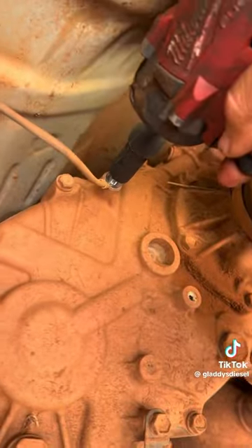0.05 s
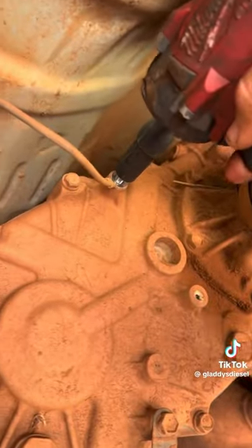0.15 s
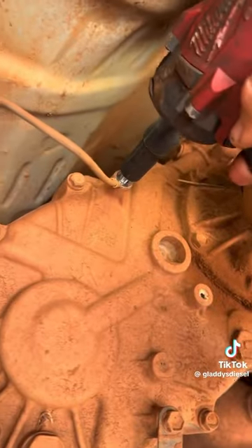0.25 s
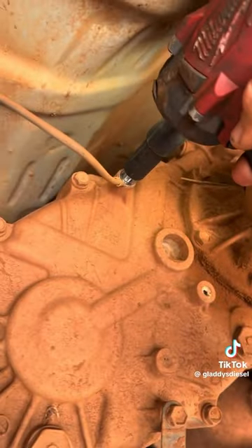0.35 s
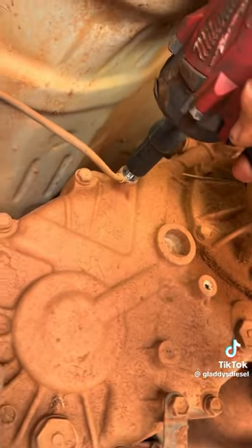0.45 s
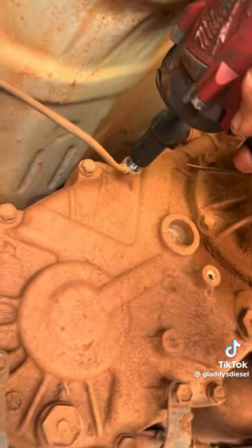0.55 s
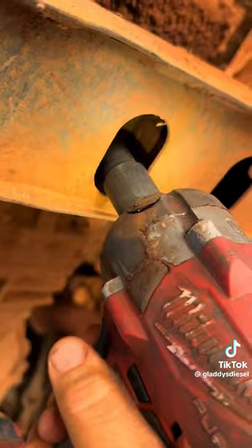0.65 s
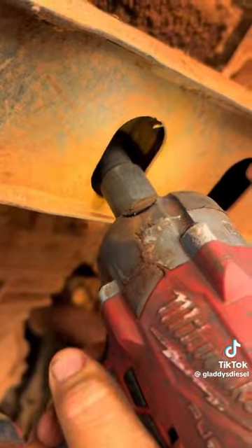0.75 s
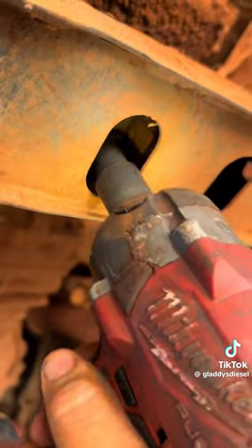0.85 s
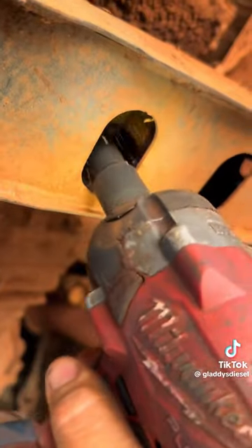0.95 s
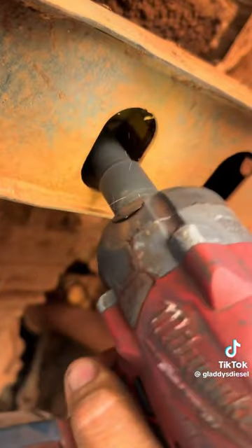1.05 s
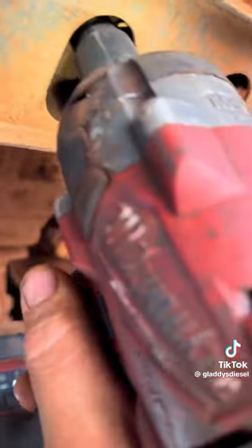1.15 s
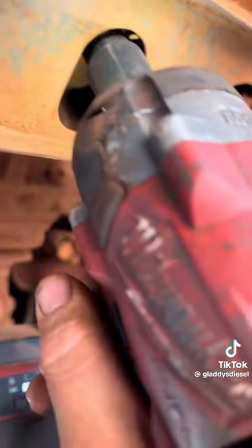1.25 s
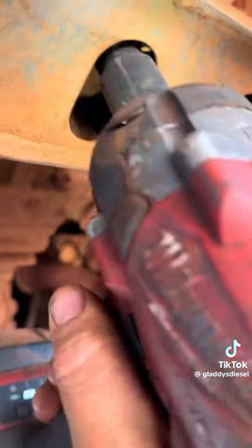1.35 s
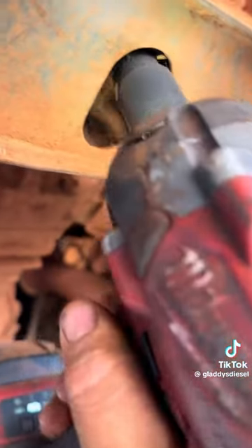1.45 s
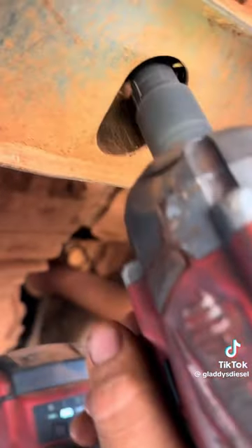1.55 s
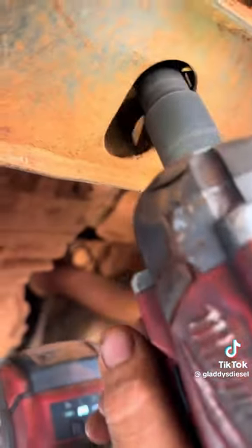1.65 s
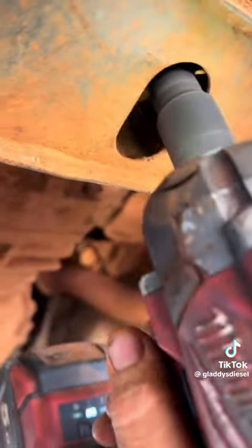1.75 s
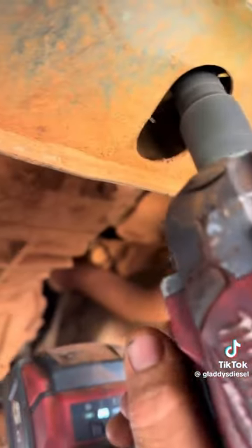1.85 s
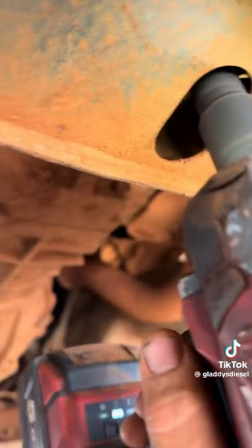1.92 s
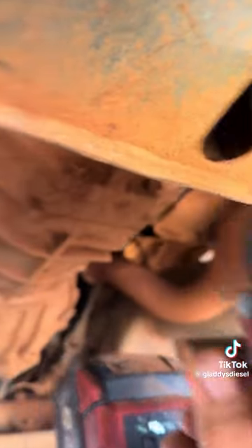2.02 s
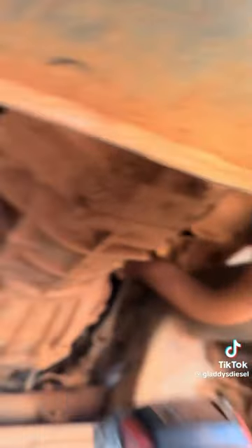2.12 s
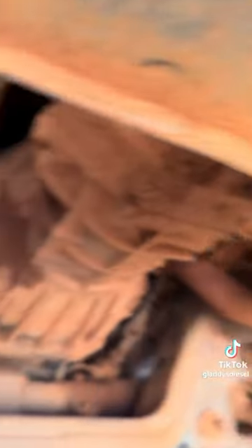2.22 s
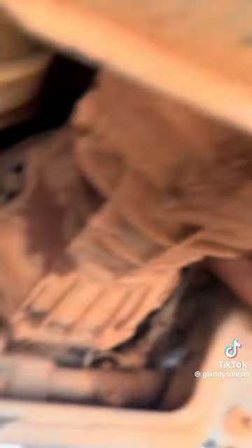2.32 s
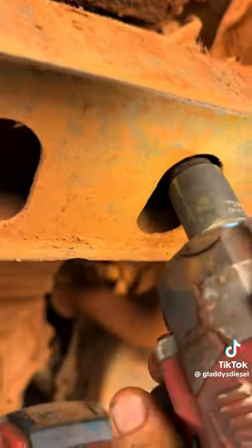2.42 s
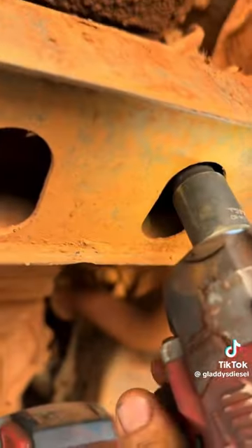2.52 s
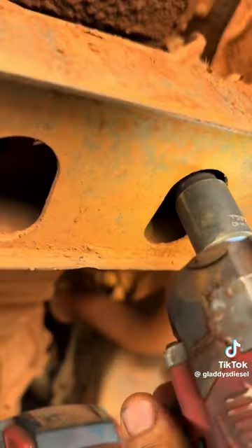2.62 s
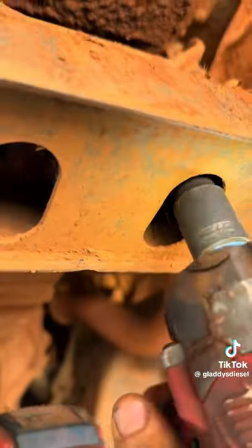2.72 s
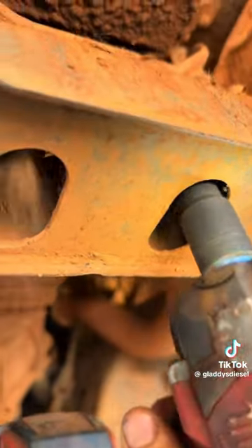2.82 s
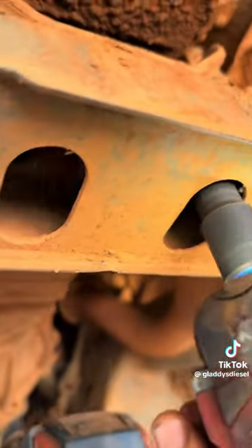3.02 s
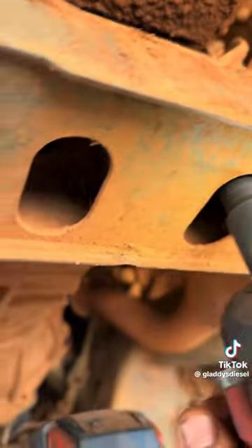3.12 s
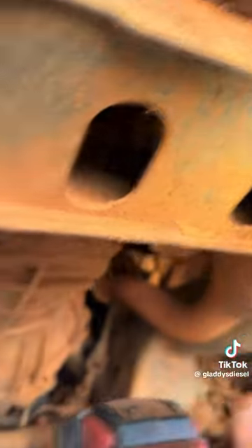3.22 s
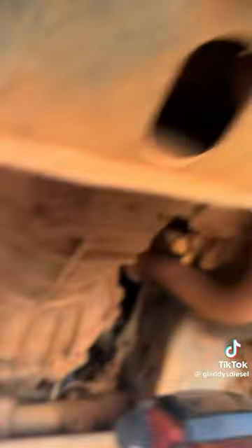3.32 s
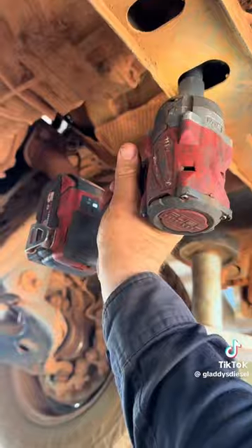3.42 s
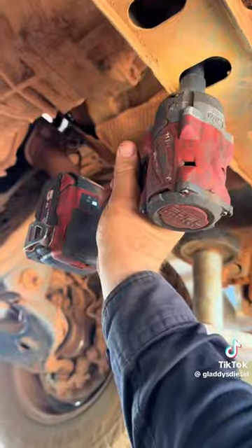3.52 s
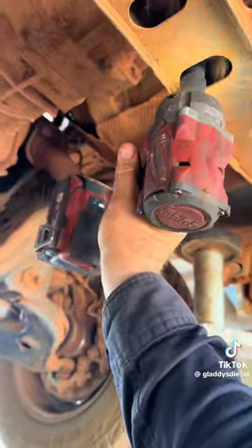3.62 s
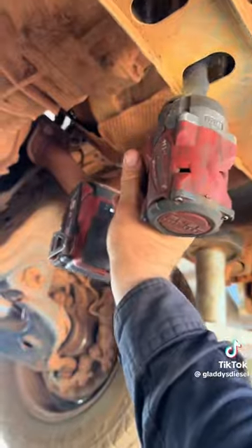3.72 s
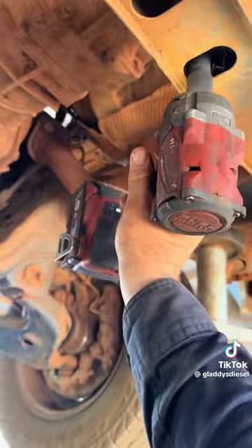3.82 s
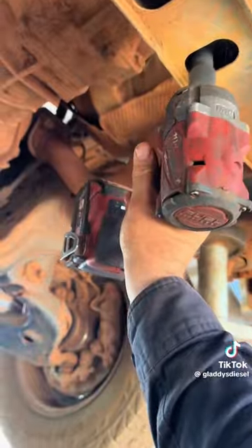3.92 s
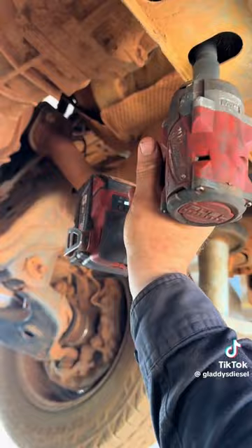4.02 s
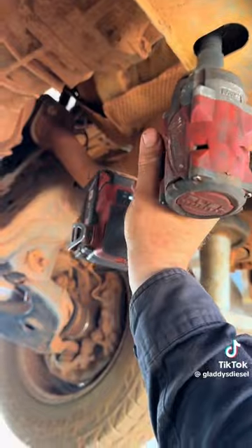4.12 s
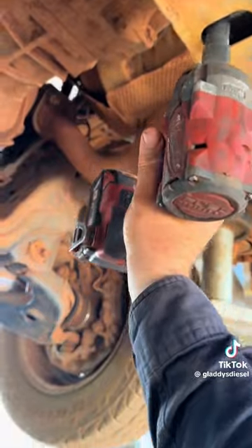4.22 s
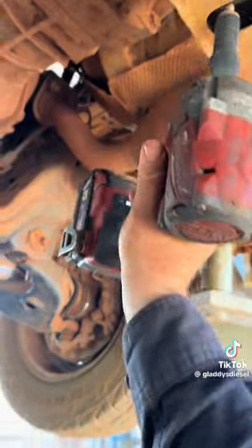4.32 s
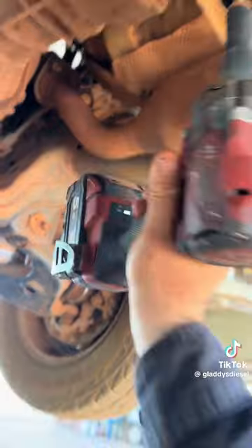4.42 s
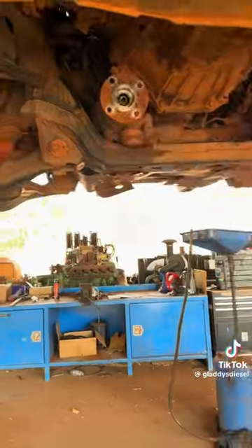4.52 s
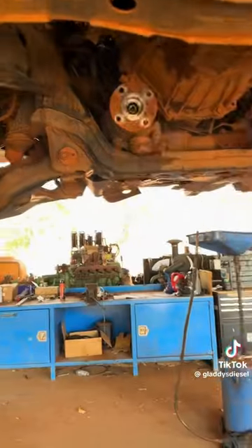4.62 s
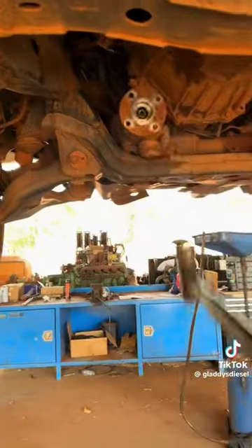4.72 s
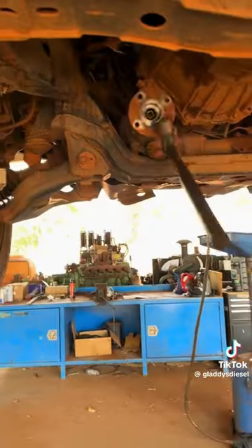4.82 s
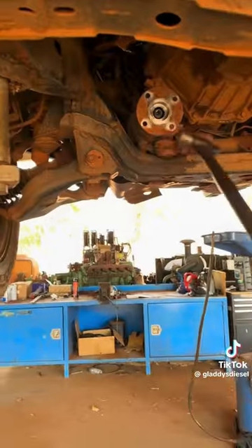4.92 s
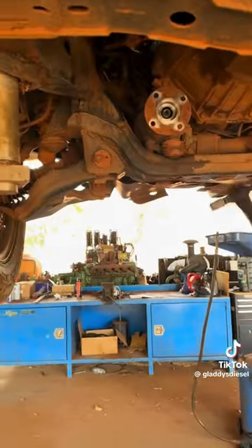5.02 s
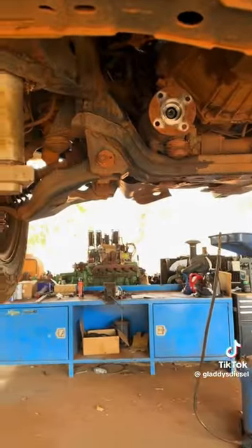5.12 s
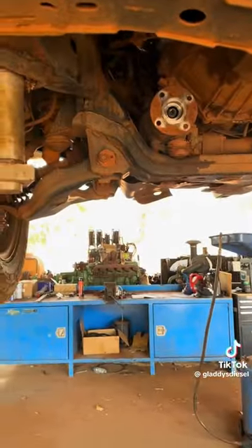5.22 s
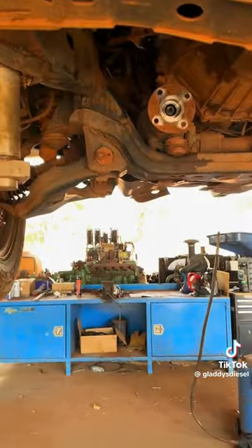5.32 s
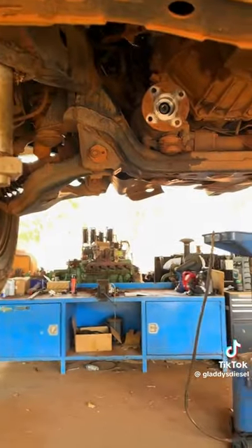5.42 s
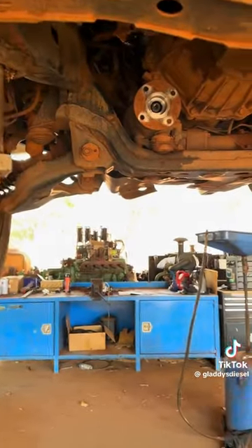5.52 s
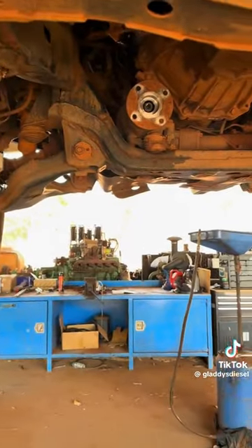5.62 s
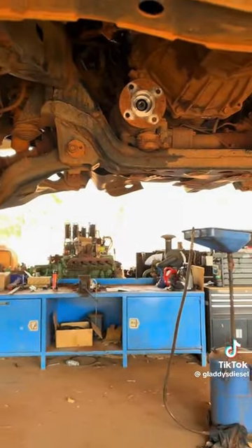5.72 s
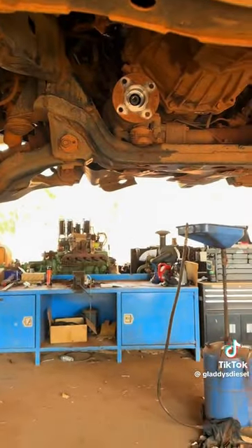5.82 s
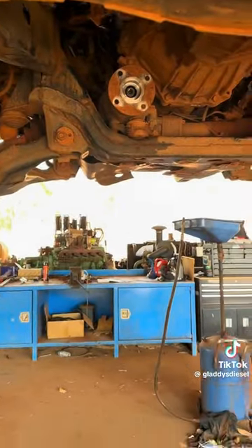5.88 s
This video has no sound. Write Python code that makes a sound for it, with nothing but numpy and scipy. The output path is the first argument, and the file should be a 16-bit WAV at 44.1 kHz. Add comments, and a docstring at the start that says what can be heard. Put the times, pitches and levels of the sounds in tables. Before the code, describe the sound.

Low workshop rumble and faint hiss, then a loose socket ticks and a battery impact wrench fires four times, close and fairly dry: brief harsh hammering, then smooth motor whine slowing down. The first burst stops abruptly; the last sounds slightly wider and more distant. Then a hard steel clank with a low panel boom, and a part clattering onto the floor with long bright reverberation.

```python
"""Workshop rumble and hiss, a low bump of the hands and a socket's tick open the scene.
A cordless impact wrench then undoes four bolts under a vehicle: the starting motor squeals and grinds,
the hammer strikes a few blows (noise bursts), and the freed bolt spins with a gear whine (sines at motor orders).
Then steel clanks against the underbody, which booms (resonant noise), and a steel part drops and bounces on
the floor of the hall (noise bursts and decaying modes)."""
import sys
import numpy as np
from scipy import signal
from scipy.fft import rfft, irfft
from scipy.io import wavfile
from scipy.ndimage import uniform_filter1d

SR = 44100
rng = np.random.default_rng(int(sys.argv[2]) if len(sys.argv) > 2 else 0)


def persist_wave(psi):
    """Save psi, clipped to +-1, as 16-bit WAV."""
    counts = np.round(np.clip(psi, -1, 1) * 32767).astype(np.int16)
    wavfile.write(sys.argv[1], SR, np.atleast_2d(counts).T)


N = 262395
TIME = np.arange(N) / SR
FREQS = np.fft.rfftfreq(N, 1 / SR)

# hammering, one row a bolt: trigger_s, hammer_start_s, hammer_end_s, rattle_db, squeal_db, grind_db,
#   rail_knock_db (relative to a blow)
BOLTS = [(0.621, 0.665, 0.78, -21, -30, -17, -15), (1.181, 1.223, 1.345, -20.5, -37.5, -20, -13),
         (2.467, 2.522, 2.62, -20, -48, -27.5, -15.5), (3.329, 3.375, 3.52, -23, -46, -22, -8.5)]
# free spinning, one row a bolt: free_s, full_speed_s, eased_s, silent_s, whirr_db, order_8_db,
#   order_13_loaded_db, order_13_full_speed_db, housing_drone_db, frame_drone_db
SPINS = [(.765, 0.979, 1.08, 1.087, -30.5, -29, -48.5, -34, -39.5, -55),
         (1.35, 1.545, 1.83, 1.94, -32, -29.5, -34, -49, -42.5, -58),
         (2.619, 2.8, 3.028, 3.155, -31.5, -29, -34, -32, -42, -53),
         (3.49, 3.651, 3.909, 4.035, -29, -28.5, -33, -29.5, -32.5, -42.5)]
# steel clanking on the underbody: start_s, level_db, crack_t60_s, ring_db
CLANKS = [(4.7445, -9.5, 0.016, -28), (4.759, -25, 0.093, -56)]
# spectrum of air hiss and of the scraping socket: frequency_hz, level_db
HISS_SPECTRUM = [(100, 6), (900, -6.5), (1800, -7), (2400, -5.5), (3000, -5.5), (3500, -6), (4300, -7.5),
                 (7000, -6.5), (9500, -8), (12000, -33.5), (16000, -26)]
# brief drop-outs of the level: start_s, end_s
DROPOUTS = [(2.358, 2.384), (3.272, 3.295)]
# motor speed in turns per second: dragging the bolt, clear of the thread, flat out, trigger eased
DRAG_HZ, CLEAR_HZ, TOP_HZ, EASED_HZ = 335.6, 376.6, 381.6, 341.6
EASE_S = .062  # the speed takes this long to sag once the trigger is eased


def amp(db):
    """Level: decibels to an amplitude ratio."""
    return 10 ** (np.asarray(db) / 20)


def unit(x):
    """Normalization: scales a signal to rms 1."""
    return x / np.sqrt(np.mean(x ** 2) + 1e-20)


def read(points, hz):
    """Interpolation: reads a spectrum table on a log-frequency axis."""
    f, value = np.transpose(points)
    return np.interp(np.log(hz + 1), np.log(f + 1), value)


def level(s, db):
    """Envelope: a gain linear in decibels between points, fading out just beyond them."""
    return amp(np.interp(TIME, np.r_[s[0] - .015, s, s[-1] + .015], np.r_[-140, db, -140]))


def gate(start, end, fade_s=.015):
    """Envelope: 1 from start to end, fading linearly just beyond them."""
    return np.interp(TIME, [start - fade_s, start, end, end + fade_s], [0, 1, 1, 0])


def add(mix, s, sound):
    """Superposition: mixes a sound in at time s."""
    part = mix[..., round(s * SR):][..., :sound.shape[-1]]
    part += sound[..., :part.shape[-1]]


def white():
    """Broadband noise: two uncorrelated signals of flat spectrum."""
    return rng.standard_normal((2, N))


def wander(rate_hz):
    """Random modulation: a smoothly varying signal of rms 1."""
    knots = np.arange(0, N / SR + 1, 1 / rate_hz)
    return unit(np.interp(TIME, knots, rng.standard_normal(len(knots))))


def tone(turns):
    """Simple harmonic motion: a sine pair in quadrature, one for each path to the ports."""
    return np.array([np.cos(2 * np.pi * turns), np.sin(2 * np.pi * turns)])


def crack(t, t60):
    """Exponential decay: a dying burst of steel-on-steel chatter."""
    return rng.standard_normal((2, len(t))) * amp(-60 * t / t60)


def colour(x, points, ripple_db=0, size=4096):
    """Minimum-phase filtering at unit energy; ripple stands for the many close modes of a metal body."""
    hz = abs(np.fft.fftfreq(size, 1 / SR))
    ripple = unit(uniform_filter1d(rng.standard_normal(size), size=9))
    mirrored = ripple[np.rint(hz * size / SR).astype(int)]
    log_gain = np.log(amp(read(points, hz) + ripple_db * mirrored))
    # the Hilbert transform of the log gain gives the phase of a causal filter
    taps = np.fft.ifft(np.exp(np.conj(signal.hilbert(log_gain)))).real[:size // 2]
    return signal.oaconvolve(x, taps[None] / np.linalg.norm(taps), axes=1)[:, :N]


def resonant(x, modes):
    """Resonance: drives steep peaks (frequency_hz, width_hz, level_db) and scales the result to rms 1."""
    gain = sum(amp(db) / (1 + (2 * (FREQS - hz) / width) ** 2) for hz, width, db in modes)
    return unit(irfft(rfft(x) * gain, N))


def ports(x, apart=0, apart_hz=600):
    """Spatial coherence: a microphone pair hears bass alike and treble out of phase."""
    # likeness of the two ports: frequency_hz, coherence
    likeness = [(100, .998), (250, .99), (600, .96), (1500, .95), (2800, .95), (4200, .55), (6000, .85),
                (8000, .72), (11000, .82), (16000, .8)]
    # phase by which the left port leads: frequency_hz, lead_radians
    lead = [(2500, 0), (4400, -.1), (6000, -.4), (8200, -1.7), (10200, -3), (14000, -3.2), (16000, -3.6)]
    a, b = rfft(x)
    # further from the tool, reflections make the ports less alike in the middle range
    middle = np.exp(-(apart_hz / (FREQS + 1)) ** 2 - (FREQS / 4000) ** 2)
    same = np.clip(read(likeness, FREQS) - apart * middle, 0, .9985)
    right = (same * a + np.sqrt(1 - same ** 2) * b) * np.exp(-1j * read(lead, FREQS))
    return irfft(np.array([a, right]), N)


def background(hum_hz=52.4):
    """Steady noise: workshop rumble, hiss and hum, and one faint narrow-band ring near the last bolt."""
    # background, steady in each stretch: start_s, rumble_db, hiss_db, hum_db
    stretches = [(0, -65.5, -73.5, -63), (.52, -54, -79, -57), (2.38, -54.5, -69.5, -65.5),
                 (3.3, -47.5, -63.5, -59), (4.41, -49.5, -53, -44), (5.38, -58.5, -52, -52)]
    # spectrum of the rumble: frequency_hz, level_db
    rumble_spectrum = [(20, -19), (55, -6.5), (110, -1.5), (160, -0.5), (230, -9), (400, -20), (1000, -36),
                       (4000, -71.5)]
    # the faint ring: start_s, end_s, level_db, pitch_hz
    faint_ring = (3.298, 3.345, -56, 2010)
    starts, *levels = np.transpose(stretches)
    stretch = np.searchsorted(starts[1:], TIME)
    rumble, hiss, hum = (uniform_filter1d(amp(db)[stretch], size=1024) for db in levels)
    start, end, ring_db, ring_hz = faint_ring
    ring = amp(ring_db) * gate(start, end) * resonant(white(), [(ring_hz, 60, 0)])
    noise = rumble * colour(white(), rumble_spectrum) + hiss * colour(white(), HISS_SPECTRUM)
    return noise + hum * tone(hum_hz * TIME) + ring


def handling(fade_s=.04):
    """Impact and friction: low bumps of the hands and a light scrape as the socket is set on a bolt."""
    # moves of the hands: start_s, length_s, bump_db, scrape_db
    moves = [(0.557, 0.14, -40.5, -51.5), (1.113, .25, -26.5, -53), (2.417, 0.029, -57, -58),
             (3.322, 0.037, -41.5, -59.5)]
    bump = sum(amp(db) * gate(s, s + length, fade_s) for s, length, db, _ in moves)
    scrape = sum(amp(db) * gate(s, s + length, fade_s) for s, length, _, db in moves)
    thud = resonant(white(), [(61.6, 26, 2), (140, 66, -14)])
    return bump * thud + scrape * colour(white(), HISS_SPECTRUM)


def socket_ticks(t60=0.0066):
    """Impulsive contact: sharp snaps of the loose socket, and a few random ones as each bolt comes free."""
    # snaps of the socket against the bolt head: start_s, level_db
    snaps = [(.578, -31.5), (0.6822, -8.5), (1.193, -8.5), (1.3513, -10.5), (2.4873, -14), (2.4956, -12.5),
             (2.6548, -15)]
    # spectrum of a snap: frequency_hz, level_db
    snap_spectrum = [(200, -14), (1500, -2.5), (4000, -5), (7500, 3), (10500, 0.5), (12500, -22.5),
                     (16000, -12)]
    per_s, settle_s = 77, 0.03  # stray ticks grow ever rarer
    stray_db, spread_db = -18, 1
    ticks, t = np.zeros((2, N)), np.arange(SR // 40) / SR
    for s, db in snaps:
        add(ticks, s, amp(db) * crack(t, t60))
    rate = sum(per_s * (TIME > free) * np.exp(-abs(TIME - free) / settle_s) for free, *_ in SPINS)
    stray = (rng.random(N) < rate / SR) * amp(stray_db + spread_db * rng.standard_normal(N))
    ticks += signal.oaconvolve(stray[None], crack(t, t60), axes=1)[:, :N]
    return colour(ticks, snap_spectrum, ripple_db=1.5)


def housing(x, ring_db, t60=0.23):
    """Modal decay: socket and gear case ring on briefly after every jolt."""
    # modes of socket and gear case: frequency_hz, level_db
    case_modes = [(389, -1.5), (702, -3), (1243, 1), (1529, -4), (1802, 2.5), (2162, -3.5), (2900, -0.5),
                  (3519, -8.5), (3883, -1)]
    t = np.arange(SR // 5) / SR
    ring = sum(amp(db - 60 * t / t60) * np.sin(2 * np.pi * hz * t) for hz, db in case_modes)
    return x + amp(ring_db) * signal.oaconvolve(x, ring[None] / np.linalg.norm(ring), axes=1)[:, :N]


def underbody(x, t60=.07):
    """Early reflection: quick, sparse echoes between the frame rails and the floor pan."""
    t = np.arange(SR // 6) / SR
    sparse = rng.random((2, len(t))) < .05
    taps = rng.standard_normal((2, len(t))) * sparse * amp(-60 * t / t60) * (t > .002)
    return signal.oaconvolve(x, taps / np.linalg.norm(taps[0]), axes=1)[:, :N]


def hall(x):
    """Reverberation: a diffuse tail of the workshop, each band dying at its own speed."""
    # reverberation time: frequency_hz, t60_s
    decay = [(100, 3.4), (500, 2), (2000, 1.67), (5000, 1.8), (8000, 1.4), (12000, 0.36), (16000, 1)]
    hz, t, z = signal.stft(rng.standard_normal((2, 2 * SR)), SR, nperseg=256)
    decaying = z * amp(-60 * t / read(decay, hz)[:, None]) * (1 - np.exp(-t / 0.0019))
    tail = signal.istft(decaying, SR, nperseg=256)[1]
    return signal.fftconvolve(x[:1], tail / np.linalg.norm(tail[0]), axes=1)[:, :N]


def wind_up(rise_db=15, grain_db=3, squeal_hz=8050, sag_hz=350):
    """Electrical whine and chatter: the starting drive whines high, the gears grind, the socket rattles between
    blows."""
    # spectrum of the rattle: frequency_hz, level_db
    rattle_spectrum = [(60, -12), (300, -4.5), (700, -0.5), (1050, -8), (1550, 3), (2100, -3), (2900, 2.5),
                       (3800, -4.5), (6500, -7), (8000, -16), (10300, -15.5), (12500, -33), (15000, -26),
                       (16500, -41.5)]
    rattle, grind, squeal = np.zeros(N), np.zeros(N), np.zeros((2, N))
    for trigger, start, end, db, squeal_db, grind_db, _ in BOLTS:
        grind_s = np.array([trigger + 0.013, trigger + 0.03, start, start + 0.011])
        grind += level(grind_s, grind_db - np.array([rise_db, 6, 0, 6]))
        rattle_s = np.array([trigger + 0.024, start, start + 0.027, end, end + 0.011])
        rattle += level(rattle_s, db - np.array([15, 1.9, 4.4, 6.5, 18]))
        u = np.linspace(0, 1, round((start - trigger + 0.0018) * SR))
        turns = np.cumsum(squeal_hz - sag_hz * u ** 2) / SR
        add(squeal, trigger, amp(squeal_db + 4.7 * u) * tone(turns) * signal.windows.tukey(len(u), .06))
    chatter = white() * unit(amp(grain_db * wander(600)))
    gearbox = resonant(chatter, [(1450, 350, -6.5), (2950, 500, -6), (7600, 1800, -10)])
    return squeal + grind * gearbox + colour(chatter * rattle, rattle_spectrum, ripple_db=3.0)


def hammer(t60=0.026, snap_t60=.012, rise_s=0.001, rebound_s=.0051, rebound_db=-16.5, kick_hz=68,
           kick_t60=.07, kick_lag_s=.004, knock_t60=.033, vary_db=2):
    """Impact: each blow cracks on the anvil, rebounds in the socket, knocks the rail and kicks the frame."""
    # hammer blows: start_s, level_db, frame_kick_db
    strikes = [(.670, -6.5, -31), (.676, -10.5, -32.5), (.692, -13, -39), (.712, -6, -37.5),
               (.732, -7.5, -37.5), (.751, -9.5, -41), (1.218, -7, -34), (1.24, -8.5, -34.5),
               (1.25, -7.5, -36), (1.263, -13, -22), (1.275, -5.5, -8), (1.295, -4, -8), (1.314, -9, -18),
               (1.339, -7, -13.5), (2.529, -10, -41), (2.541, -10, -39), (2.55, -9.5, -29),
               (2.565, -5.5, -31), (2.586, -7.5, -13.5), (2.608, -6, -27), (2.826, -22, -51.5),
               (2.851, -19, -47), (3.382, -7, -38), (3.394, -3.5, -36.5), (3.409, -6, -40),
               (3.418, -10.5, -38), (3.434, -12, -31), (3.44, -7.5, -40), (3.46, -6.5, -34.5),
               (3.4994, -12.5, -17.5)]
    # spectra of the blow, the rail's knock and an even base for the varied colour: frequency_hz, level_db
    blow_spectrum, rail_spectrum, flat = [(50, -21), (250, -2.5), (700, -3.5), (1000, -1), (1600, -1),
                                          (2700, -3.5), (3600, -3.5), (5000, -4.5), (7000, -5.5),
                                          (9000, -6), (10500, -13), (12500, -25.5), (15000, -8.5),
                                          (16500, -41.5)], [(150, -26), (400, -7.5), (700, 3.5), (1000, -16),
                                                          (2000, -30.5), (8000, -55)], [(100, 0), (16000, 0)]
    blows, knocks, kicks = np.zeros((3, 2, N))
    t = np.arange(SR // 8) / SR
    contact = 1 - np.exp(-(t / rise_s) ** 2)
    for s, db, kick_db in strikes:
        knock_db = [bolt[-1] for bolt in BOLTS if bolt[0] < s][-1]
        blow = amp(db) * (crack(t, t60) + crack(t, snap_t60)) * contact
        add(blow, rebound_s * rng.uniform(.7, 1.3), amp(db + rebound_db) * crack(t, 0.011))
        # the socket seats differently at each blow, which shifts the colour
        add(blows, s, colour(blow, flat, ripple_db=vary_db, size=512))
        add(knocks, s + .0012, amp(db + knock_db) * crack(t, knock_t60))
        turns = kick_hz * t + 0.56 * (1 - np.exp(-t / .0046))  # the kick falls in pitch at first
        add(kicks, s + kick_lag_s, amp(kick_db - 60 * t / kick_t60) * np.sin(2 * np.pi * turns))
    return colour(blows, blow_spectrum, ripple_db=1.5) + colour(knocks, rail_spectrum) + kicks


def motor_speed(free, clear, eased, brake_hz_per_s=2100):
    """Torque and load: speed climbs as the thread lets go, creeps to its top, sags when eased, then brakes."""
    speed = np.interp(TIME, [free, clear, eased, eased + EASE_S], [DRAG_HZ, CLEAR_HZ, TOP_HZ, EASED_HZ])
    return np.maximum(speed - brake_hz_per_s * np.maximum(TIME - eased - EASE_S, 0), 1)


def spin(flutter=.003, shimmer=.11, low_shimmer=0.29, wobble=0.19, mesh=0.29, orders_db=1):
    """Rotational orders: gear lines at multiples of motor speed, and tooth noise pulsing with the socket."""
    # weak motor orders, relative to the whirr and before orders_db: multiple, level_db
    weak_orders = [(2, -24.5), (4, -7.5), (12, -22.5), (16, -21)]
    # spectrum of the tooth noise: frequency_hz, level_db
    whirr_spectrum = [(60, -19.5), (160, 2.5), (280, -4.5), (1100, -1), (1550, 5), (1950, 0), (2400, 2),
                      (3500, -2.5), (5400, -2), (6400, 0.5), (8500, -2.5), (10300, -5), (12500, -55.5),
                      (15000, -2.5), (16500, -38)]
    # the frame, shaken by the spinning bolt: frequency_hz, width_hz, level_db
    frame_modes = [(50, 40, -8.5), (110, 50, -9), (153, 36, 0.5), (230, 90, -11)]
    case_hz, case_width_hz, off_case_db = 3007, 160, -9.5  # order 8 swells in a gear-case resonance
    overrun_db = 5  # the floor under order 8 rises while the socket overruns the slowing motor
    whine_rise_s = .085  # the whine emerges from the rattle after the bolt comes free
    load_dip_db = -3  # the whirr is quieter while the thread still drags
    whirr_power, whine_power = 1.4, 6.0  # exponents of motor speed
    speed, low, high, whirr, drone, frame = np.zeros((6, N))
    for free, clear, eased, silent, whirr_db, low_db, loaded_db, high_db, drone_db, frame_db in SPINS:
        hz, on = motor_speed(free, clear, eased), gate(free, silent, fade_s=.025)
        speed = np.where(on > 0, hz, speed)
        rise = np.clip((TIME - free) / whine_rise_s, 0, 1)
        whine = on * rise * np.minimum(hz / EASED_HZ, 1) ** whine_power
        noise = on * (hz / TOP_HZ) ** whirr_power
        unloaded = np.clip((hz - EASED_HZ) / (TOP_HZ - EASED_HZ), 0, 1) ** 2
        in_case = 1 / np.hypot(1, 2 * (8 * hz - case_hz) / case_width_hz) ** 2
        overrun = np.clip((TIME - eased) / EASE_S, 0, 1)
        thread_s = [free, (free + clear) / 2, clear]
        loose = np.interp(TIME, thread_s, [.35, .25, 1])  # the freed bolt shakes housing and frame
        low += whine * amp(low_db) * np.maximum(in_case, amp(off_case_db + overrun_db * overrun))
        high += whine * amp(loaded_db + (high_db - loaded_db) * unloaded)
        whirr += noise * amp(whirr_db + np.interp(TIME, thread_s, [0, load_dip_db, 0]))
        drone += on * np.sqrt(hz / TOP_HZ) * loose * amp(drone_db)
        frame += on * loose * amp(frame_db)
    turns = np.cumsum(speed * (1 + flutter * wander(150))) / SR
    gears = low * tone(8 * turns) * (1 + low_shimmer * wander(80))
    gears += high * tone(13 * turns) * (1 + shimmer * wander(120))
    # the weak orders sink into the noise as the motor coasts down
    weak = sum(amp(db) * tone(round(k) * turns + .068 * wander(68)) for k, db in weak_orders)
    gears += amp(orders_db) * whirr * (speed / TOP_HZ) ** 2 * weak
    socket = 1 + wobble * np.cos(2 * np.pi * turns / 10)  # geared down ten to one
    teeth = unit(1 + mesh * np.cos(2 * np.pi * turns))
    gears += whirr * colour(white() * unit(teeth * socket), whirr_spectrum, ripple_db=.5)
    housing_drone = drone * socket * resonant(white(), [(600, 330, -5.5), (753, 210, 4.5)])
    return gears + housing_drone + frame * resonant(white(), frame_modes)


def steel(hits, spectrum, modes, near_db, hall_db, snap_db=2):
    """Struck modes: a snap, a crack, modes that waver as the part turns, and the answer of the hall."""
    cracks, rings = np.zeros((2, 2, N))
    t = np.arange(SR) / SR
    waver = .18  # rms share of each mode's amplitude
    ring = sum(amp(d - 60 * t / life) * tone(hz * t + rng.random()) * (1 + waver * wander(37.0)[:SR])
               for hz, d, life in modes)
    for s, db, t60, ring_db in hits:
        add(cracks, s, amp(db) * (crack(t, t60) + amp(snap_db) * crack(t, 0.0075)))
        add(rings, s, amp(ring_db) * ring)
    cracks = colour(cracks, spectrum, ripple_db=0.5)
    reflected = amp(near_db) * underbody(cracks, t60=0.14)
    return cracks + rings + reflected + amp(hall_db) * hall(cracks + 0.11 * rings)


def clank():
    """Impact excitation: steel knocks against the underbody."""
    # spectrum of the crack: frequency_hz, level_db
    spectrum = [(100, -9), (700, -5.5), (1200, -11), (1650, 3), (1950, -5), (2450, -0.5), (3600, -10.5),
                (4500, -2), (5300, -2.5), (6500, -8.5), (7700, -12), (9000, -12), (11000, -25),
                (16000, -58)]
    # ringing modes: frequency_hz, level_db, t60_s
    modes = [(1630, -29, 1.6), (1720, -21, 1.6), (2410, 19, 0.022), (2820, -21, 1.8), (3010, -19, 1.9),
             (4230, -22, 1.4), (4540, 3.5, 0.53), (5450, 16, 0.019), (6000, -19, 1.6), (7200, -21, 1.6),
             (11030, -14, 1.17)]
    return steel(CLANKS, spectrum, modes, near_db=-8, hall_db=-8.5)


def panel_boom():
    """Low-frequency resonance: the knocked underbody panel swells, sags slowly, then dies."""
    # resonances of the panel: frequency_hz, width_hz, level_db
    panel_modes = [(91.3, 26, -9.5), (118.2, 18, -3), (151.5, 14, -4.5), (167.5, 18, 3), (243, 25, -15.5),
                   (304, 40, -15)]
    boom_db, attack_s, hold_s = -28.5, .025, 0.36
    sag_db_per_s, release_db_per_s = 12.5, 40  # the release adds to the sag
    t = np.maximum(TIME - CLANKS[0][0], 0)
    db = boom_db - sag_db_per_s * t - release_db_per_s * np.maximum(t - hold_s, 0)
    return np.minimum(t / attack_s, 1) * amp(db) * resonant(white(), panel_modes)


def dropped_part():
    """Impact excitation: a steel part falls to the floor."""
    # strikes: start_s, level_db, crack_t60_s, ring_db
    hits = [(5.3272, -12.5, 0.083, -70), (5.3465, -7.5, 0.078, -29)]
    # spectrum of the crack: frequency_hz, level_db
    spectrum = [(60, -11), (300, -5), (700, -5), (1400, -5), (2200, 1.5), (3200, -6), (4300, -9),
                (6000, -6), (7400, -12), (9000, -11), (11000, -25.5), (16000, -29)]
    # ringing modes: frequency_hz, level_db, t60_s
    modes = [(670, 14, 0.054), (1910, -3.5, 1.1), (1974, -2.5, 0.95), (2050, -4, 0.48), (2440, 13, 0.032),
             (3020, -21, 1), (3130, -14, 5.9), (5200, -18, 1.5), (5902, -11, 0.85), (7170, -8, 0.83)]
    return steel(hits, spectrum, modes, near_db=-12.0, hall_db=-11.5)


def bounces():
    """Repeated impact: the part bounces on the floor."""
    # strikes: start_s, level_db, crack_t60_s, ring_db
    hits = [(5.6825, -13.5, 0.04, -30.5), (5.696, -21, 0.043, -51), (5.765, -37, 0.03, -50),
            (5.8565, -15, 0.037, -46)]
    # spectrum of the crack: frequency_hz, level_db
    spectrum = [(100, -32), (450, -17), (1200, -20), (1800, -9.5), (3000, 0), (3800, -9), (4400, -7),
                (6000, -16), (7000, -25), (8000, -16.5), (11000, -41), (16000, -43)]
    # ringing modes: frequency_hz, level_db, t60_s
    modes = [(1682, -4, 0.23), (1710, -8, 0.3), (2970, -5, 0.64), (3200, -9, 0.32), (3035, 21.5, 0.034),
             (4340, -11, 1), (6540, -12, .25)]
    return steel(hits, spectrum, modes, near_db=-7, hall_db=-14)


def scene():
    """Direct and reverberant sound: the wrench is close and fairly dry; the steel parts ring into the hall."""
    # the wrench and its reflections fall silent briefly between the first two bolts: start_s, end_s
    first_stop = (1.087, 1.178)
    wrench = spin() + housing(wind_up() + hammer() + socket_ticks(), ring_db=-22)
    wrench = wrench + amp(-11.0) * underbody(wrench, t60=0.089) + amp(-29.5) * hall(wrench)
    stopped = (TIME > first_stop[0]) & (TIME < first_stop[1])
    wrench = wrench * uniform_filter1d(1. - stopped, size=128)
    last_bolt = TIME > DROPOUTS[1][0]  # here the microphone pair is held further back
    parts = clank() + dropped_part() + bounces()
    near = wrench * ~last_bolt + parts + panel_boom() + handling() + background()
    return ports(near) + ports(wrench * last_bolt, apart=0.84)


def record(dry):
    """Saturation and band limiting: the level drops out briefly twice, peaks round off, the top is cut."""
    running = 1. - sum((TIME > a) & (TIME < b) for a, b in DROPOUTS)
    rounded = np.tanh(dry * uniform_filter1d(running, size=128))
    edge_hz = 16300
    low_pass = signal.firwin(511, edge_hz, window=("kaiser", 9), fs=SR)
    return signal.oaconvolve(rounded, low_pass[None], "same")


dry = scene()
out = record(dry)
persist_wave(out)
```